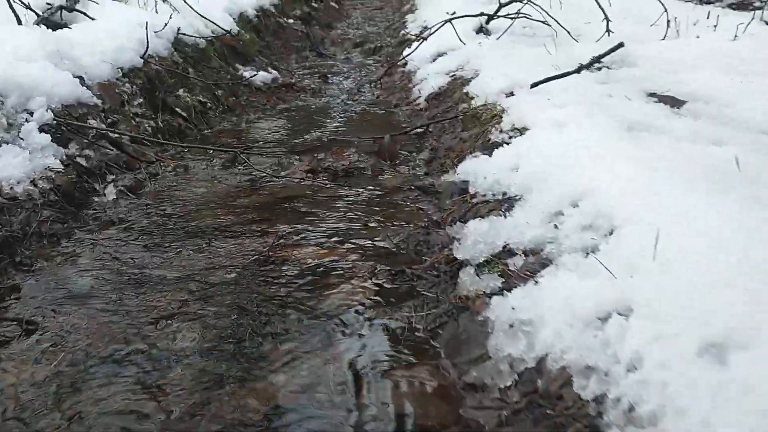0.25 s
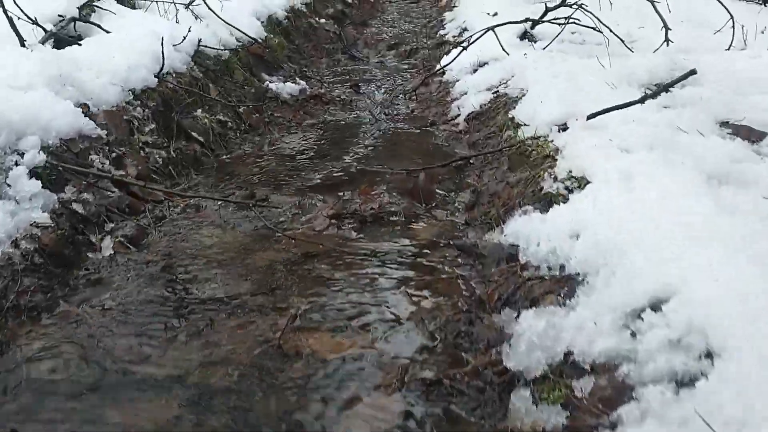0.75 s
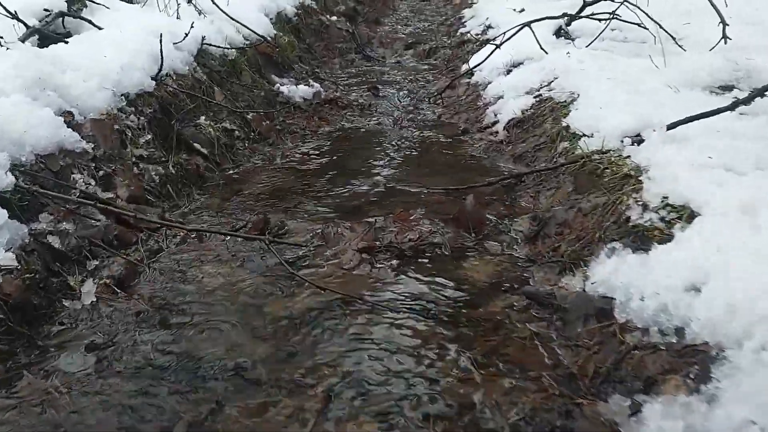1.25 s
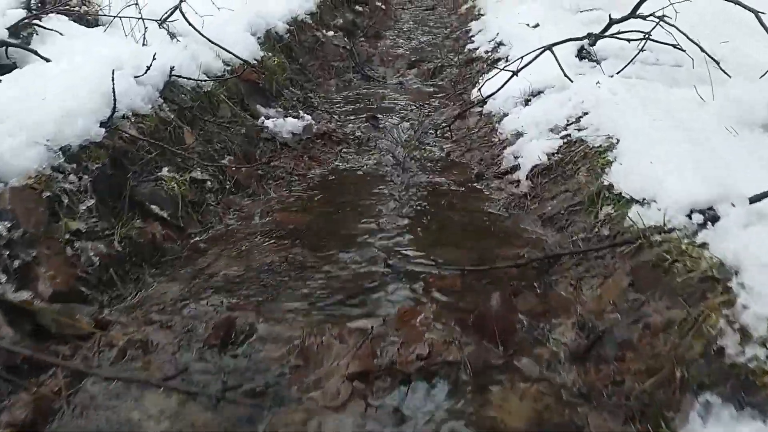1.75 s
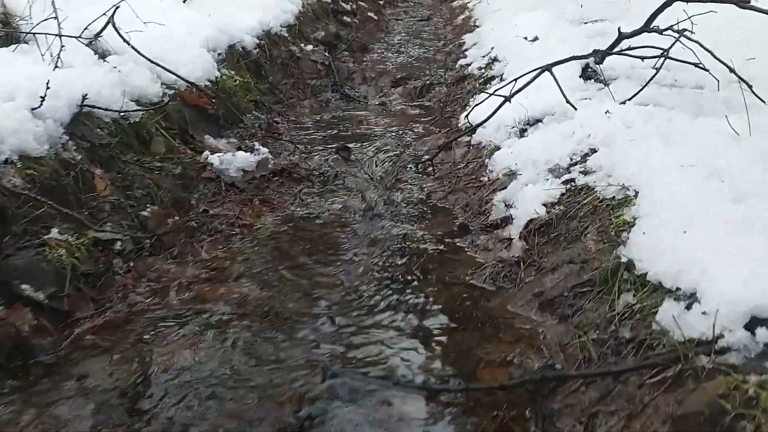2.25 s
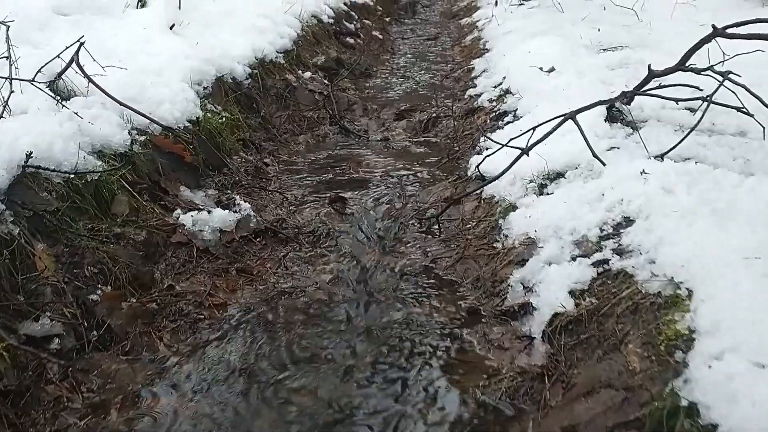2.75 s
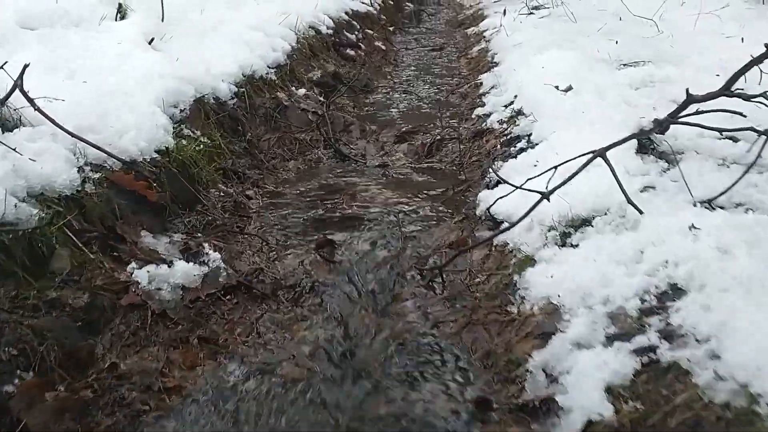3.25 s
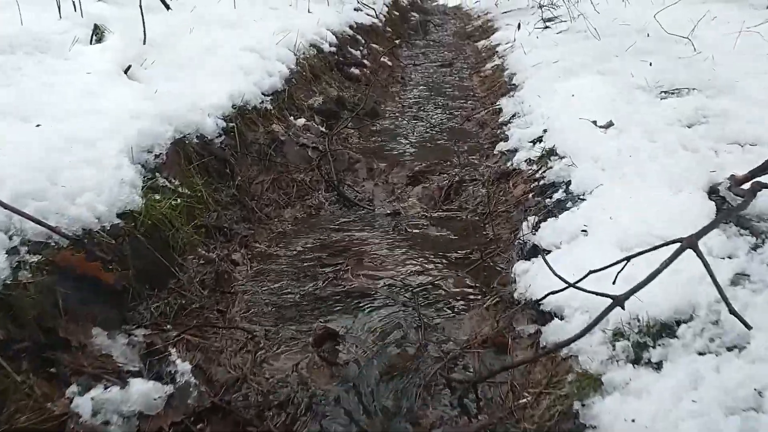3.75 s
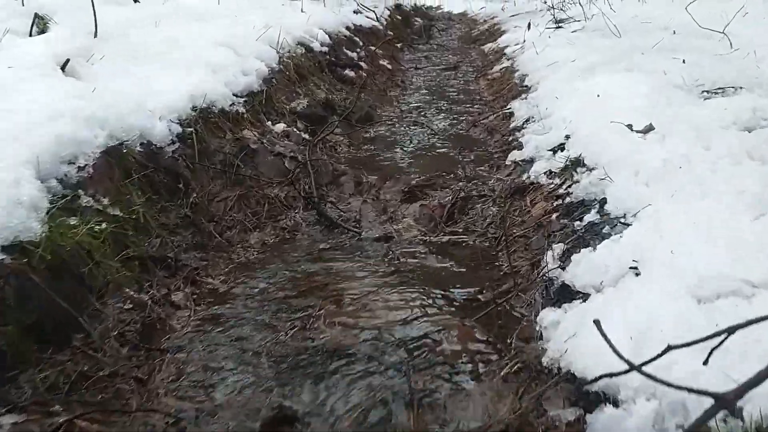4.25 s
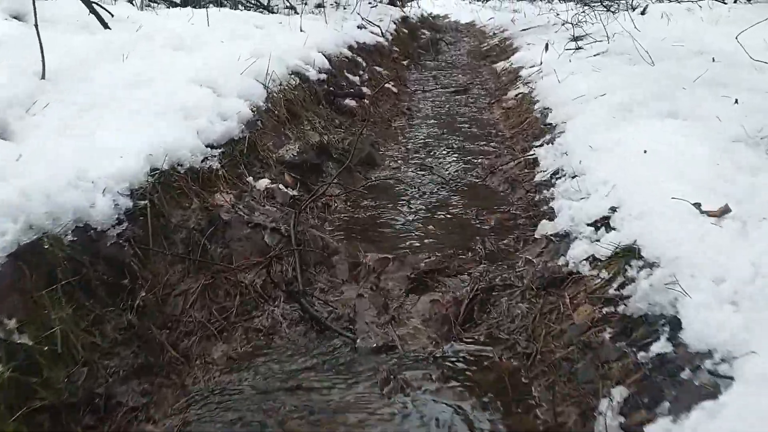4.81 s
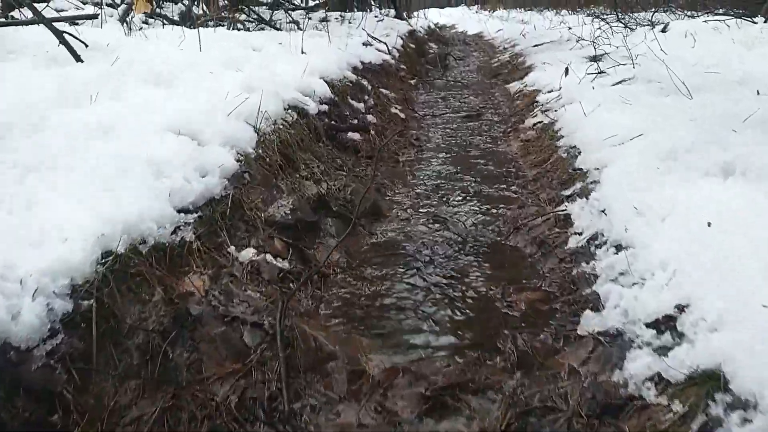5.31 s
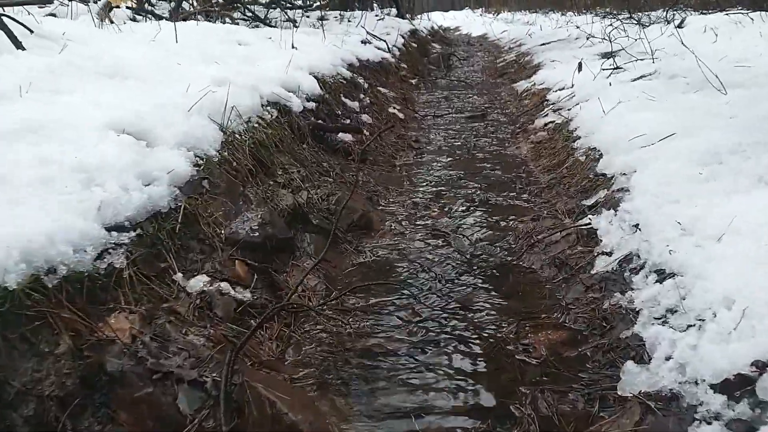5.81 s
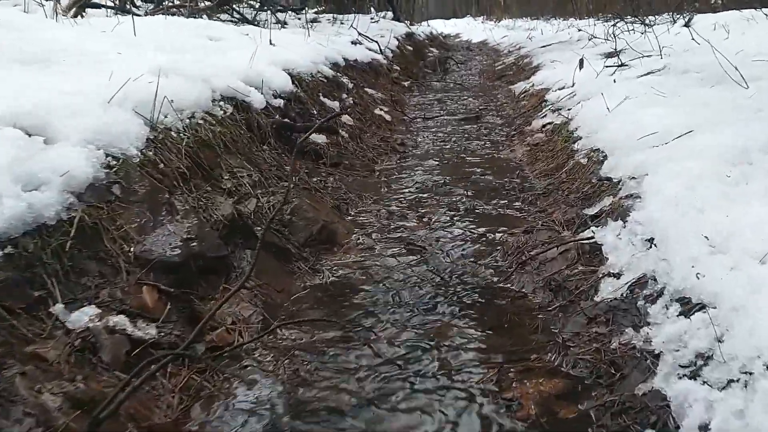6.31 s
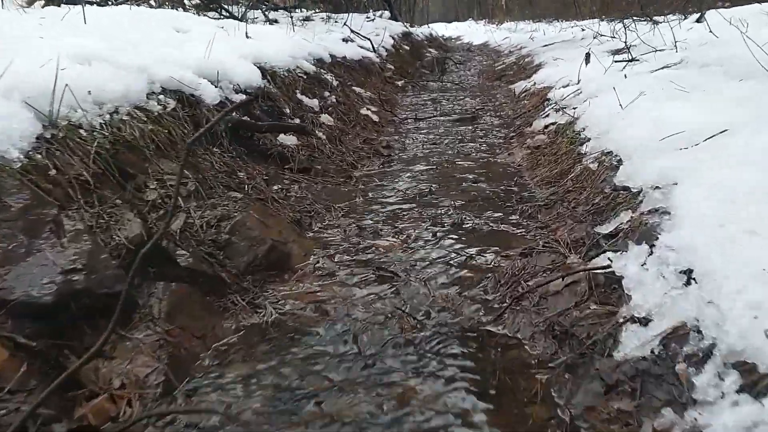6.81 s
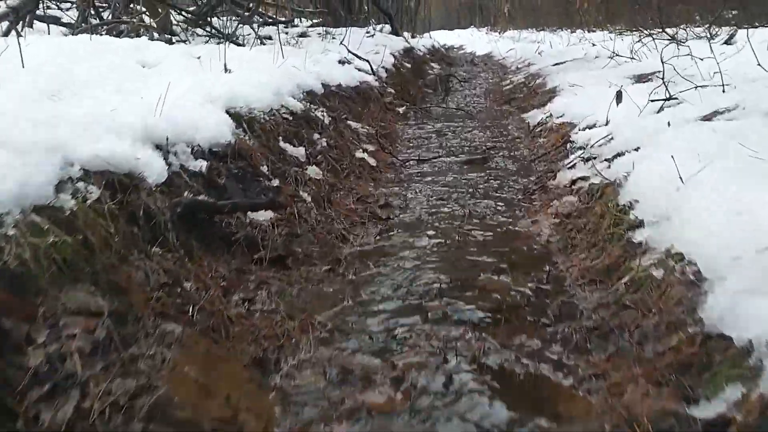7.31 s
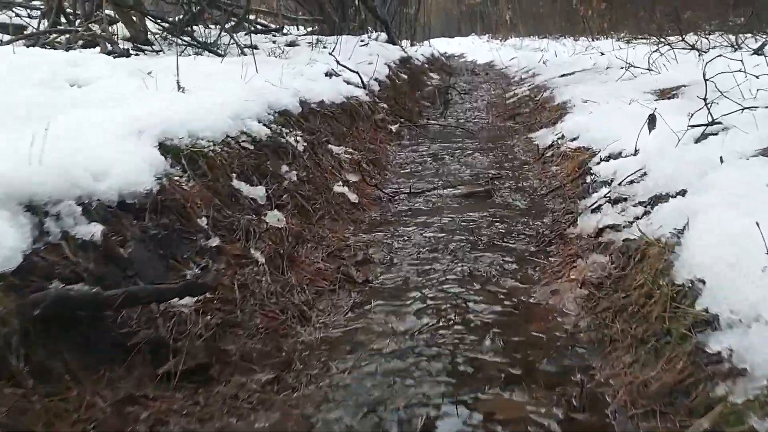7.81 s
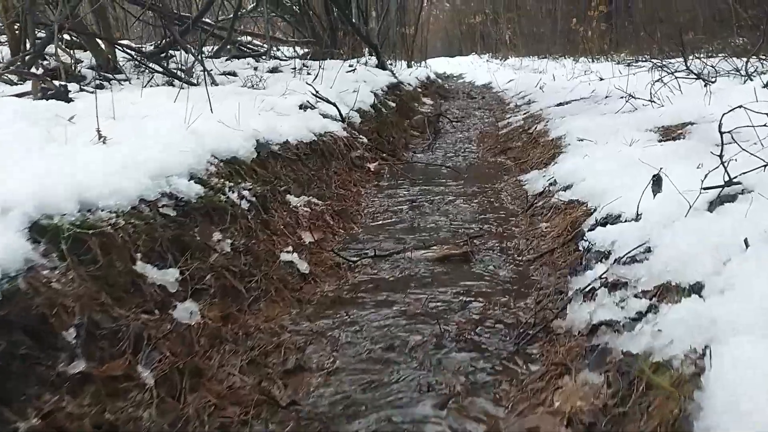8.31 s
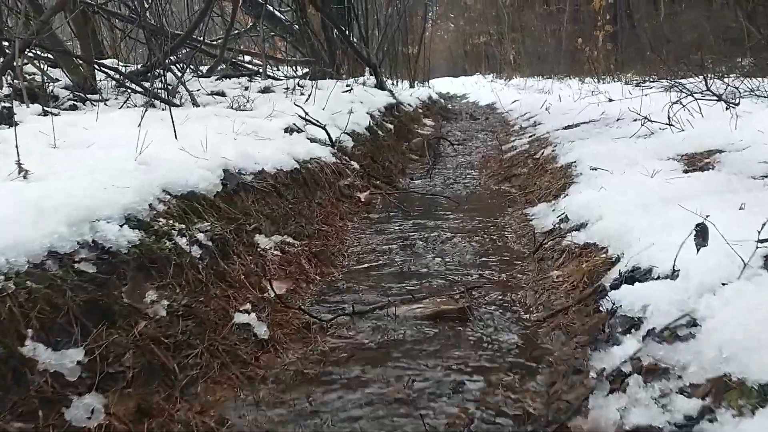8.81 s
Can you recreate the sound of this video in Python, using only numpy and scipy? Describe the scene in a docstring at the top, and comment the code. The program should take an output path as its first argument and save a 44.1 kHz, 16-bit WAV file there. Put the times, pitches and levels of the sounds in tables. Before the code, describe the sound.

Slow wading in a shallow snow-banked stream: crisp splashes, watery churn, bubble plops and falling drips, ending with one heavier plunging step.

```python
"""Rubber boots wade along a flooded forest track while thaw water trickles underneath throughout.
From the start, swinging boots shed ticking drops, and pushes churn the water: swarms of rings plus noise.
Single bubbles ring as gliding sines, sheets of water slap as noise bursts, and boots knock on the bed.
Deep steps heave low, fluttering noise aside, and small drips fall back into the moving water.
Past six seconds a nylon sleeve swishes by on the left; the wading goes on to the end."""
import sys
import numpy as np
from scipy import signal
from scipy.fft import rfft, irfft, next_fast_len
from scipy.io import wavfile
from scipy.ndimage import uniform_filter1d, map_coordinates

SR = 44100
rng = np.random.default_rng(int(sys.argv[2]) if len(sys.argv) > 2 else 0)


def store_pcm(level_fs):
    """Save levels as 16-bit WAV."""
    pcm = np.round(np.clip(level_fs, -1, 1) * 32767).astype(np.int16)
    wavfile.write(sys.argv[1], SR, np.atleast_2d(pcm).T)


N = 399546  # length in samples

# A boot breaks the surface: start_s, spray_db, slosh_db, left_ear_lag_ms
STEPS = [(.19, -35, -46, .1), (0.862, -35, -46, 0.15), (1.727, -37.5, -45, -0.15),
         (2.814, -38, -44.5, 0.067), (3.823, -45.5, -41.5, -0.073), (4.767, -37.5, -42, 0.062),
         (5.72, -38, -39.5, -.12), (6.591, -40, -43.5, 0.068), (7.606, -50, -44, -0.059),
         (8.33, -43, -47, 0.082), (8.801, -41.5, -55, 0.015)]


def amp(db):
    """Turn decibels into a gain."""
    return 10 ** (np.asarray(db) / 20)


def unit(x):
    """Scale a sound to an average strength (rms) of 1."""
    return x / np.sqrt(np.mean(x ** 2) + 1e-20)


def along(points, hz):
    """Read a curve of (Hz, value) points, joined by straight lines on a log frequency axis."""
    point_hz, value = np.transpose(points)
    return np.interp(np.log(hz + 1), np.log(point_hz + 1), value)


def wobble(rate):
    """Draw a smooth random curve with rate random points a second."""
    points = rng.standard_normal(int(N * rate / SR) + 4)
    return map_coordinates(points, [np.arange(N) * rate / SR])


def filtered(x, response):
    """Multiply the spectrum of x by a response that depends on frequency."""
    size = x.shape[-1]
    padded = next_fast_len(size + 8192)  # spare room keeps the end from wrapping round to the start
    hz = np.fft.rfftfreq(padded, 1 / SR)
    return irfft(rfft(x, padded) * response(hz), padded)[..., :size]


def coloured(x, spectrum):
    """Shape x by a spectrum that falls away steeply below its first point, at rms 1."""
    def response(hz):
        bass_cut = np.minimum(hz / spectrum[0][0], 1) ** 2
        return amp(along(spectrum, hz)) * bass_cut
    return unit(filtered(x, response))


def add(track, s, sound):
    """Mix a sound into a track at time s, cutting off what runs past the end."""
    part = track[..., max(round(s * SR), 0):][..., :sound.shape[-1]]
    part += sound[..., :part.shape[-1]]  # part is a view, so this changes the track


def swell(length, rise, fall_db_per_s):
    """Gain of one movement: it rises, sags a little while it lasts, then falls away."""
    sag_db = 1.5  # lost over the length of the movement
    t = np.arange(SR) / SR
    sag = sag_db * np.minimum(t / length, 1)
    fall = fall_db_per_s * np.maximum(t - length, 0)
    return np.minimum(t / rise, 1) * amp(-sag - fall)


def rush(spectrum):
    """Stereo noise whose left and right are as alike at each frequency as the table says."""
    # Left-right likeness: pitch_hz, likeness (1 = the same, 0 = unrelated)
    likeness = [(30, 0.39), (100, 0.99), (400, 0.79), (1200, 0.27), (3000, 0.6), (10000, .05)]

    def mid_side_gains(hz):
        turn = np.arccos(np.clip(along(likeness, hz), -1, 1)) / 2
        return np.array([np.cos(turn), np.sin(turn)])
    mid, side = filtered(rng.standard_normal((2, N)), mid_side_gains)
    return coloured(np.array([mid + side, mid - side]), spectrum)


def swarm(spectrum, low_hz, high_hz, cycles, scatter_db, climb, spread_ms, count, size):
    """count small bubbles, each a damped rising sine from its own direction, evened out in level."""
    when, pitch, life, strength, side = rng.random((count, 5)).T[:, :, None]
    hz = low_hz * (high_hz / low_hz) ** pitch
    decay = cycles * (.5 + life) / hz / np.pi
    sign = np.sign(rng.standard_normal((count, 1)))
    gain = amp(-scatter_db * np.log(1 - .99 * strength)) * sign
    index = ((when * N).astype(int) + np.arange(size)).ravel()
    pair = []
    for ear in (side, 1 - side):
        t = np.maximum(np.arange(size) / SR - spread_ms * ear / 1000, 0)  # each ear hears it a bit late
        cycles_done = hz * t * (1 + climb * np.tanh(t / decay / 4))
        ring = gain * np.exp(-t / decay) * np.sin(2 * np.pi * cycles_done)
        pair.append(np.bincount(index, ring.ravel(), N)[:N])  # sum all rings where they overlap
    pair = coloured(np.array(pair), spectrum)
    power = uniform_filter1d(np.mean(pair ** 2, 0), size=1500)
    power = uniform_filter1d(power, size=1500)
    return unit(pair / np.sqrt(abs(power) + 0.043))


def patchy(pair, depth_db):
    """Clumps of like-sized bubbles favour narrow bands for a few milliseconds each."""
    z = signal.stft(pair, nperseg=256)[2]
    field = uniform_filter1d(rng.standard_normal(z.shape[1:]), size=7, axis=0)
    field = uniform_filter1d(field, size=3, axis=1)
    return unit(signal.istft(z * amp(depth_db * unit(field)), nperseg=256)[1][:, :N])


def stream():
    """Thaw water trickles down the track: a gently wavering rush of noise with a swarm of bubbles."""
    # Colour of the rush: pitch_hz, relative_level_db
    flow_colour = [(30, -22), (60, -6), (100, -2), (160, -5.5), (290, -8.5), (420, -17), (520, -11),
                   (720, -18.5), (1000, -20.5), (1400, -13), (2100, -19.5), (4500, -19), (9000, -22),
                   (16000, -29)]
    trickle_colour = [(500, -14), (1400, -26), (4000, -1), (9000, -9)]
    trickle = swarm(trickle_colour, 733, 7000, cycles=20, scatter_db=9.0, climb=.15, spread_ms=0.42,
                    count=1100, size=900)
    flow = amp(wobble(4))
    return amp(-64) * flow * rush(flow_colour) + amp(-74.5) * trickle


def shedding():
    """The lifted boot sheds drops as it swings forward, each a short tick of noise on water and leaves."""
    # Swings of a lifted boot: start_s, length_s, level_db (typical drop, before the band filter)
    swings = [(0, 0.18, -44), (0.538, 0.38, -43), (2.616, 0.16, -45), (3.52, 0.3, -44.5),
              (4.559, 0.16, -44), (5.199, 0.24, -50.5)]
    drops_per_s, drop_t60_s, scatter_db = 36, .014, 4  # t60: time to fade by 60 dB
    track, t = np.zeros(N), np.arange(SR // 40) / SR
    for s, length, db in swings:
        for k in range(int(length * drops_per_s)):
            start = s + (k + rng.random()) / drops_per_s
            tick = rng.standard_normal(len(t)) * amp(-60 * t / drop_t60_s)
            add(track, start, amp(db + scatter_db * rng.standard_normal()) * tick)
    return signal.lfilter(*signal.butter(1, [3000, 11000], "band", fs=SR), track)


def agitation():
    """Levels in dB of spray, slosh and churn: entries, pushes, and the slowly fading wash of the pushes."""
    # A boot pushes through the water or is drawn out: start_s, length_s, spray_db, slosh_db, churn_db
    surges = [(0, 0.14, -54.5, -56, -64.5), (0.167, 0.077, -40.5, -51, -57),
              (0.221, 0.052, -35, -37.5, -60), (0.272, 0.057, -43, -44, -49.5),
              (0.358, 0.079, -45.5, -42, -47), (0.442, 0.14, -57.5, -59.5, -64.5),
              (0.92, 0.18, -43, -48, -61), (1.017, 0.067, -40.5, -39.5, -52.5),
              (1.09, 0.079, -43.5, -44.5, -54.5), (1.403, 0.24, -62, -58, -64),
              (1.814, 0.23, -47, -53, -75), (1.983, 0.043, -40.5, -36.5, -50.5),
              (2.046, 0.053, -50, -40, -52.5), (2.108, 0.12, -59, -48.5, -58),
              (2.237, 0.019, -40.5, -36.5, -46), (2.823, 0.02, -41, -45.5, -66),
              (2.876, .09, -51.5, -53.5, -65), (2.958, .11, -47, -46.5, -56.5),
              (3.075, 0.045, -51, -49, -60), (3.32, 0.038, -67, -49, -61), (3.351, 0.02, -50, -42.5, -45),
              (3.22, 0.13, -74, -62, -61), (3.501, 0.12, -66, -61.5, -69), (3.82, 0.21, -56.5, -55, -66),
              (3.994, 0.13, -43.5, -46.5, -49.5), (4.151, 0.074, -49, -46.5, -47),
              (4.241, 0.084, -59.5, -57, -51), (4.399, 0.057, -52, -51.5, -48),
              (4.663, 0.12, -63, -61.5, -61), (4.802, 0.087, -42.5, -49, -59.5),
              (4.899, 0.13, -43, -54, -64), (4.957, 0.047, -47, -38, -47.5), (5.024, .035, -60, -53, -56.5),
              (5.334, 0.2, -60.5, -58.5, -64.5), (5.536, 0.24, -50.5, -58, -71),
              (5.759, 0.083, -52.5, -50.5, -66), (5.856, 0.093, -43, -51, -65.5),
              (5.984, .05, -56, -52, -59.5), (6.06, 0.13, -64.5, -63, -61), (6.153, 0.074, -54, -46, -51),
              (6.189, 0.042, -48, -47.5, -44.5), (6.63, 0.12, -45.5, -48.5, -62),
              (6.751, 0.057, -39.5, -39, -55), (6.819, 0.037, -45, -47, -52.5),
              (7.068, 0.22, -73.5, -59, -66.5), (7.544, 0.056, -53.5, -51, -66),
              (7.645, 0.086, -49.5, -52, -67), (7.704, 0.044, -44.5, -34.5, -41.5),
              (7.749, 0.16, -42.5, -38.5, -50.5), (7.924, 0.044, -60, -57, -51.5),
              (8.083, 0.11, -56, -53.5, -51.5), (8.21, 0.19, -51, -44.5, -45.5),
              (8.325, 0.053, -43, -38.5, -40), (8.379, 0.069, -41, -35.5, -34.5),
              (8.551, 0.1, -48, -48, -68), (8.682, 0.1, -56.5, -57, -76), (8.814, 0.015, -43.5, -36, -48.5)]
    entry_rise_s, entry_hold_s, entry_fall_db_per_s = 0.009, 0.022, 257
    surge_rise_s, surge_fall_db_per_s = .012, 482
    wash_db, wash_fall_db_per_s = [[-19.5], [-22.5], [-17]], 28.5  # relative to the push that left it
    power, wash = np.zeros((3, N)), np.zeros((3, N))
    for s, spray_db, slosh_db, _ in STEPS:
        gain = amp([[spray_db], [slosh_db], [-np.inf]])  # an entry makes no churn
        add(power, s, (gain * swell(entry_hold_s, entry_rise_s, entry_fall_db_per_s)) ** 2)
    for s, length, *levels_db in surges:
        gain = amp(levels_db)[:, None]
        add(power, s, (gain * swell(length, surge_rise_s, surge_fall_db_per_s)) ** 2)
        add(wash, s, (gain * amp(wash_db) * swell(length, length, wash_fall_db_per_s)) ** 2)
    return 10 * np.log10(power + wash + 1e-12)


def splashing(spray_db, slosh_db, churn_db):
    """Each step tears the water into fine spray, bubbles of all sizes and a low churn, in uneven spurts."""
    # Colours of the three layers: pitch_hz, relative_level_db
    spray_colour = [(1500, -8), (3500, -8.5), (5000, -5), (7000, -2.5), (10000, -4), (13000, -9.5),
                    (16000, -12.5)]
    slosh_colour = [(500, -34), (900, -17), (1350, -2), (2200, 3), (3500, 2), (5000, -5), (9000, -62)]
    churn_colour = [(150, -2.5), (330, -12), (510, -1.5), (700, -3), (950, 0), (1200, -3.5), (2000, -25)]
    spurts = wobble(130)
    spray = swarm(spray_colour, 2980, 13660, cycles=5.7, scatter_db=4, climb=0.084, spread_ms=0.19,
                  count=16000, size=170)
    slosh = swarm(slosh_colour, 950, 4480, cycles=3.4, scatter_db=4.5, climb=0.19, spread_ms=0.21,
                  count=5500, size=380)
    gurgle = swarm(slosh_colour, 750, 3400, cycles=14, scatter_db=5, climb=.36, spread_ms=.14,
                   count=1000, size=1200)
    churn = swarm(churn_colour, 322, 1220, cycles=2.9, scatter_db=4.5, climb=0.15, spread_ms=0.23,
                  count=2000, size=1300)
    # each layer mixes its bubbles with noise of the same colour
    spray = patchy(spray + amp(-5.5) * rush(spray_colour), depth_db=2.0)
    slosh = patchy(slosh + gurgle + amp(-4.5) * rush(slosh_colour), depth_db=2.0)
    churn = unit(churn + amp(-0.5) * rush(churn_colour))
    return (amp(spray_db + 2.4 * spurts) * spray
            + amp(slosh_db + 1.35 * spurts) * slosh
            + amp(churn_db + 1.5 * spurts) * churn)


def drips(slosh_db, count):
    """Drops fall back, louder while the water is astir: a tiny tick, then a small bubble."""
    track, t = np.zeros(N), np.arange(SR // 25) / SR
    astir_db = np.minimum(slosh_db, -57)  # even a big splash makes drips no louder than this allows
    for when, pitch, strength, life in rng.random((count, 4)):
        hz = 1100 * 4.2 ** pitch
        envelope = np.exp(-t * hz / (4 + 7 * life)) * (1 - np.exp(-t / 0.00037))
        ring = np.sin(2 * np.pi * hz * t * (1 + 7 * t)) * envelope
        tick = np.diff(rng.standard_normal(len(t) + 1)) * amp(-60 * t / 0.013)
        gain = amp(astir_db[int(when * N)] + 5 + 10 * strength ** 2)
        start = when * N / SR
        add(track, start, gain * 0.5 * tick)
        add(track, start + 0.00339 * life, gain * ring)
    return track


def bubbles():
    """A trapped air pocket rings at a gliding pitch; one that climbs far enough is gone at the surface."""
    # Single bubbles: start_s, level_db, start_pitch_hz, climb_octaves_per_s (negative falls)
    single_bubbles = [(.074, -36, 2110, -1), (.242, -20, 2070, 19), (.429, -25.5, 1426, 7.5),
                      (.682, -41, 1930, 16), (0.925, -36.5, 1490, 2), (1.002, -35, 2750, 31),
                      (1.017, -40, 890, 5), (1.132, -33, 2000, -6), (1.137, -36, 1000, 20),
                      (1.172, -37, 800, -9.5), (1.586, -44, 1195, 13), (1.938, -38.5, 997, -1),
                      (2.03, -24, 1420, -19), (2.043, -34, 860, -8), (2.153, -29.5, 4200, 0),
                      (2.257, -29, 1250, -0.5), (2.351, -37, 1210, 33), (2.501, -34.5, 3520, 17),
                      (3.009, -34.5, 1404, -5), (3.049, -33.5, 917, 11), (3.163, -28.5, 754, -4),
                      (4.09, -29.5, 1135, -22), (4.54, -35, 1400, 7.5), (4.677, -39.5, 1245, 10),
                      (4.848, -30.5, 1340, 1), (5.015, -33, 1300, 29), (5.396, -35, 718, 3),
                      (5.474, -42.5, 844, 24), (5.739, -25.5, 2470, 0), (5.913, -22, 2370, 15),
                      (6.022, -37, 1410, -2), (6.612, -28, 3210, 2), (6.779, -28.5, 1720, 20),
                      (6.813, -36, 1700, 12), (6.856, -29.5, 1984, 3.5), (7.092, -40.5, 895, 0.5),
                      (7.259, -41, 1240, 16), (7.318, -46, 2010, 6), (7.648, -32.5, 2480, 0),
                      (7.736, -22.5, 1204, 2.5), (7.873, -22.5, 2620, -2), (7.905, -35, 1375, 28),
                      (7.946, -32, 786, -38), (8.409, -26, 1050, 10), (8.514, -29.5, 2360, 23),
                      (8.737, -37, 2590, -1), (8.772, -34.5, 1610, -3)]
    # A boot's hole in the water closes, with a long glug or a short plop:
    # start_s, level_db, start_pitch_hz, t60_s (fade by 60 dB), climb_octaves_per_s
    glugs = [(3.154, -38.5, 363, 0.58, 17), (3.177, -33.5, 720, 0.083, 42), (4.192, -25, 938, 0.079, 31),
             (4.212, -38.5, 561, 0.28, 21.5), (8.333, -10, 1252, 0.021, -14),
             (8.336, -10.5, 1150, 0.027, -12)]
    t60_at_1khz_s, size_law = 0.048, 0.42  # smaller, higher bubbles die sooner
    track, t = np.zeros(N), np.arange(SR // 5) / SR
    pockets = [(s, db, hz, t60_at_1khz_s * (hz / 1000) ** -size_law, climb)
               for s, db, hz, climb in single_bubbles]
    for s, db, hz, t60, climb in pockets + glugs:
        octaves = np.minimum(climb * t, 2)
        surfaced = np.clip((1.6 - octaves) / .25, 0, 1)  # fades to nothing by 1.6 octaves up
        onset = 1 - np.exp(-t / 0.00037)
        late_cut = 1 + (t / t60 / 0.95) ** 8
        envelope = surfaced * amp(db - 60 * t / t60) * onset / late_cut
        add(track, s, envelope * np.sin(2 * np.pi * np.cumsum(hz * 2 ** octaves) / SR))
    return track


def slaps():
    """A sheet of water hits: a bright crack and a briefly ringing air pocket; long slaps start softer."""
    # Slaps: start_s, level_db (before a shared 4.5 dB cut), ring_hz, t60_s, crack_db (next to the ring)
    slap_list = [(.162, -20, 2830, 0.006, -2.5), (.244, -35, 2210, 0.016, -14), (.354, -25, 1160, 0.015, 6),
                 (.36, -20.5, 1460, 0.018, -12), (.889, -17.5, 5950, 0.021, -12),
                 (.916, -18.5, 5940, .014, -7), (1.086, -21, 5900, .022, -7),
                 (2.007, -21.5, 2080, .018, -10), (2.194, -15, 2260, 0.017, -26),
                 (2.214, -18.5, 6500, .016, -1), (2.245, -20.5, 1820, 0.031, -1.5),
                 (2.817, -38, 5000, .011, -10), (2.988, -22.5, 3260, 0.024, -22),
                 (3.142, -22, 4200, 0.011, -12), (3.154, -13.5, 2260, 0.017, -20),
                 (3.159, -11.5, 1830, 0.0087, -27), (3.317, -21, 3770, 0.0078, -22),
                 (3.696, -26, 6500, 0.013, -7), (3.97, -22, 9300, 0.0083, -15),
                 (4.19, -21.5, 3120, 0.016, -25), (4.432, -31, 1280, .012, -20),
                 (4.844, -25, 1360, 0.063, -21), (4.98, -25, 1680, 0.065, 8.5), (4.986, -13, 1600, .021, 0),
                 (5.613, -29, 3440, 0.025, -11), (5.874, -15, 3470, 0.0092, -4.5),
                 (5.913, -32, 2560, 0.024, 2), (6.213, -28, 2930, 0.024, 11),
                 (7.619, -23, 2650, 0.024, -25), (8.204, -33, 2490, 0.016, 12),
                 (8.333, -10, 1400, 0.014, 0), (8.445, -23.5, 1720, 0.028, -2),
                 (8.566, -24.5, 4650, 0.029, -22), (8.664, -27.5, 5060, 0.016, 2.5),
                 (8.804, -20.5, 2040, 0.019, 5)]
    track, t = np.zeros(N), np.arange(SR // 8) / SR
    for s, db, hz, t60, crack_db in slap_list:
        noise = rng.standard_normal((2, len(t)))
        pocket = signal.lfilter(*signal.iirpeak(min(hz, SR / 3), 3, SR), noise[0])
        crack = signal.lfilter(*signal.butter(1, [1700, 9000], "band", fs=SR), noise[1])
        onset = 1 - np.exp(-(t / t60 / .035) ** 2)
        fall = amp(-60 * t / t60) * onset
        strength = np.sqrt(np.mean(fall ** 2))
        pocket = unit(pocket * fall) * strength
        crack = unit(crack * fall) * strength
        add(track, s - .0005, amp(db - 4.5) * (pocket + amp(crack_db) * crack))
    return track


def thuds():
    """The sole meets the soft bed: a few low cycles and a muffled puff of noise."""
    # Dull knocks: start_s, level_db (of the tone, before the bass cut), pitch_hz
    knocks = [(.175, -38, 100), (.283, -39, 185), (0.412, -34.5, 171), (.503, -40.5, 239), (.938, -34, 134),
              (1.993, -35.5, 302), (2.034, -38.5, 197), (2.896, -31, 614), (3.932, -43.5, 153),
              (4.115, -45, 240), (4.432, -41, 157), (4.783, -40.5, 162), (4.842, -35, 110),
              (4.957, -38, 209), (5.815, -47, 90), (7.723, -27, 304), (7.806, -31.5, 250),
              (7.946, -24.5, 373), (7.966, -30, 590), (8.3, -13, 400), (8.354, -20.5, 236),
              (8.382, -14.5, 320), (8.391, -20, 127)]
    cycles = 7.2  # until a knock has faded by 60 dB
    track, t = np.zeros(N), np.arange(SR // 6) / SR
    for s, db, hz in knocks:
        band = signal.butter(2, [.5 * hz, 2.0 * hz], "band", fs=SR)
        puff = unit(signal.lfilter(*band, rng.standard_normal(len(t))))
        envelope = amp(db - 60 * t * hz / cycles) * (1 - np.exp(-t / 0.00039))
        add(track, s, envelope * (np.sin(2 * np.pi * hz * t) + 0.62 * puff))
    return signal.lfilter(*signal.butter(4, 92, "high", fs=SR), track)


def heaving():
    """A deep step shoves a mass of water aside, which flutters against the boot as low noise."""
    # Heaves: start_s, length_s, level_db (before flutter and bass cut)
    heaves = [(.29, 0.12, -44.5), (1.978, 0.096, -61), (6.186, 0.064, -52.5), (7.7, 0.16, -63),
              (8.35, 0.069, -33.5)]
    # Colour: pitch_hz, relative_level_db
    heave_colour = [(100, -36), (130, 1.5), (190, 4), (250, 9.5), (380, -1.5), (700, -25)]
    rise_s, fall_db_per_s = 0.022, 330
    level = np.zeros(N)
    for s, length, db in heaves:
        add(level, s, amp(db) * swell(length, rise_s, fall_db_per_s))
    flutter = amp(wobble(90))
    return signal.lfilter(*signal.butter(3, 90, "high", fs=SR), level * flutter * rush(heave_colour))


def sleeve():
    """A jacket sleeve brushes by on the left: nylon slides over nylon in one bright swish of noise."""
    # The brush: start_s, length_s, level_db (midway between the ears)
    brush = (6.142, 0.071, -29.5)
    # Colour: pitch_hz, relative_level_db
    nylon_colour = [(4000, -1), (7000, 1), (9500, 9.5), (12000, -2), (16000, -8)]
    rise_s, fall_db_per_s, pan_db = 0.072, 900, 7  # pan_db: left louder than right
    s, length, db = brush
    level = np.zeros(N)
    add(level, s, amp(db) * swell(length, rise_s, fall_db_per_s))
    return level * rush(nylon_colour) * amp([[pan_db / 2], [-pan_db / 2]])


def placed(pair):
    """Sound reaches the nearer ear first; a small delay between the ears moves with each step."""
    s, _, _, lag_ms = np.transpose(STEPS)
    step = np.searchsorted(s, np.arange(N) / SR + .05) - 1  # moves over just before the step
    step = np.maximum(step, 0)
    lag = uniform_filter1d(lag_ms[step], size=4000) * SR / 1000  # in samples
    return np.array([map_coordinates(x, [np.arange(N) + way * lag / 2]) for x, way in zip(pair, (-1, 1))])


def banks(pair, t60, size):
    """Legs, water and snowy banks scatter a short, diffuse answer, drawn afresh for each overlapping piece."""
    # Colour of the scattered sound: pitch_hz, gain_db
    bank_colour = [(100, -6.5), (500, -7), (1300, -3.5), (3000, 3), (12000, 1)]
    t, out = np.arange(SR // 8) / SR, np.zeros((2, N))
    for start in range(0, N - size // 2, size // 2):
        piece = pair[:, start:start + size]
        fade = amp(-60 * t / t60) + amp(-44 - 60 * t / 0.66)  # quick scatter plus a faint longer tail
        tail = rng.standard_normal((2, len(t))) * fade * (t > .0006)
        tail = filtered(tail / np.linalg.norm(tail[0]), lambda hz: amp(along(bank_colour, hz)))
        faded_piece = piece * np.hanning(size)[:piece.shape[1]]
        add(out, start / SR, signal.fftconvolve(faded_piece, tail, axes=1))
    return out


def scene():
    """Put together the steps, their scatter and the stream."""
    spray_db, slosh_db, churn_db = agitation()
    water = splashing(spray_db, slosh_db, churn_db) + drips(slosh_db, count=280)
    steps = placed(water + heaving() + slaps() + bubbles() + thuds() + shedding() + sleeve())
    return steps + amp(-4.5) * banks(steps, t60=0.016, size=8192) + stream()


def record(dry):
    """The two microphones differ a little in colour; nothing is kept above the band limit."""
    top_hz = 16200
    # left minus right: pitch_hz, difference_db
    lean_points = [(200, -1.8), (1100, -2.0), (2200, -1.2), (4000, -2.0), (8000, 0.4), (13000, -0.5)]

    def response(hz):
        lean = along(lean_points, hz)
        return amp(np.array([lean, -lean]) / 2) * (hz < top_hz)
    return filtered(dry, response)


dry = scene()
out = record(dry)
store_pcm(out)
```